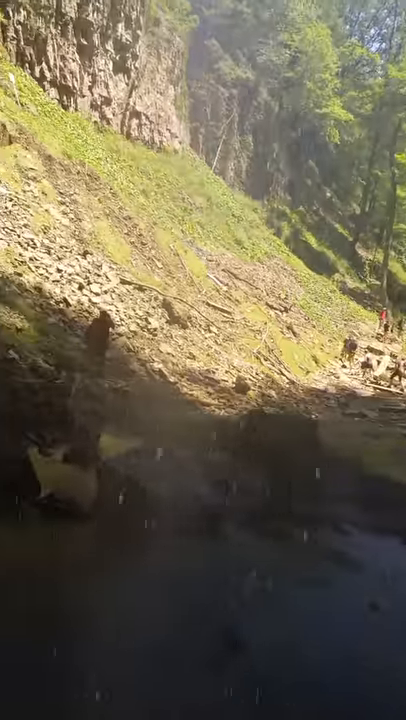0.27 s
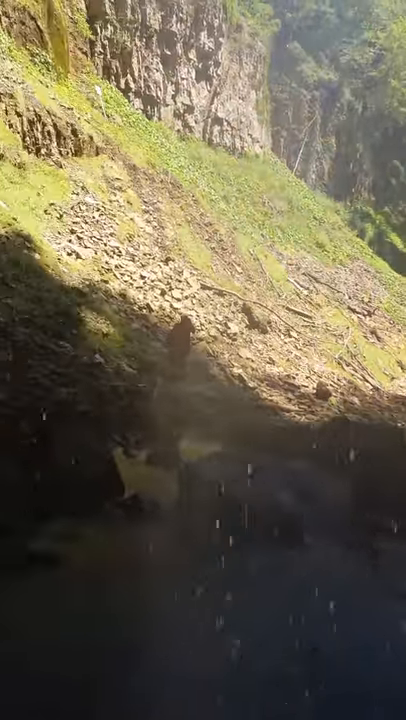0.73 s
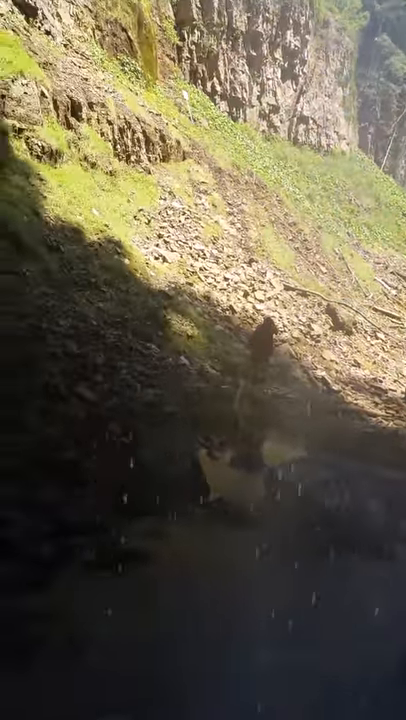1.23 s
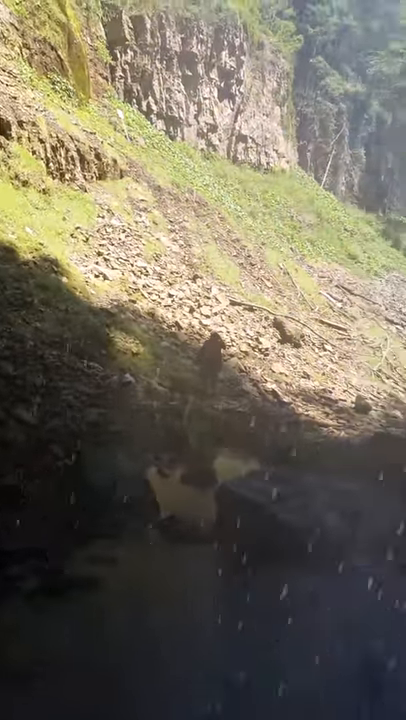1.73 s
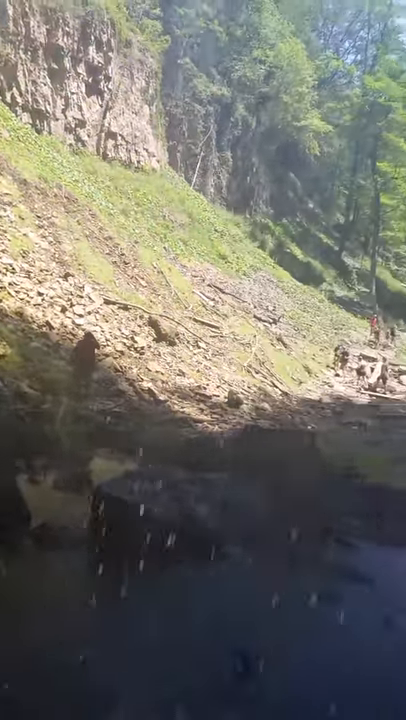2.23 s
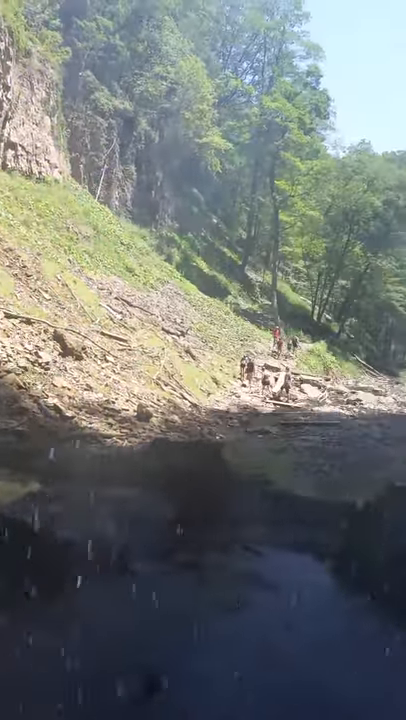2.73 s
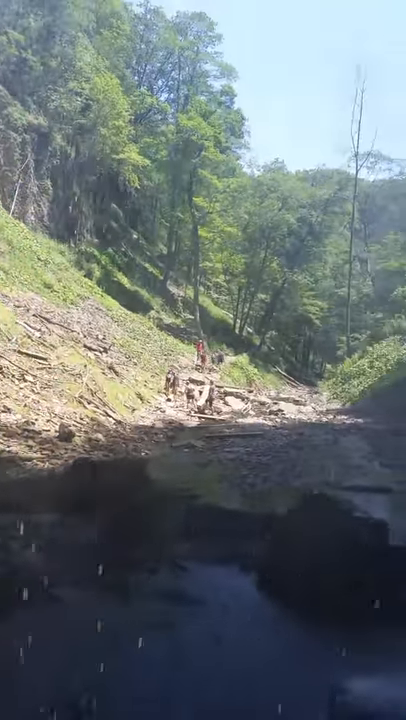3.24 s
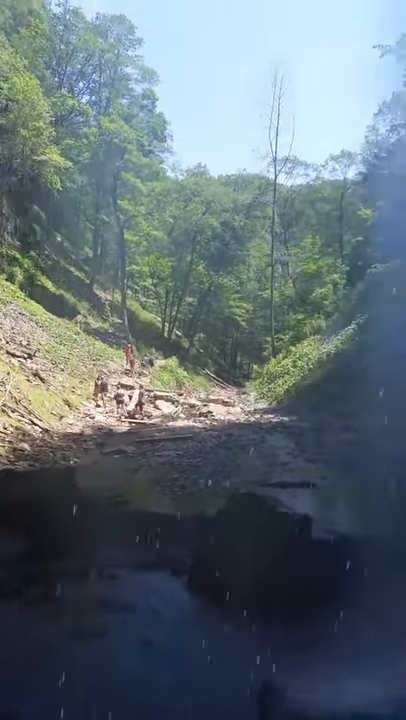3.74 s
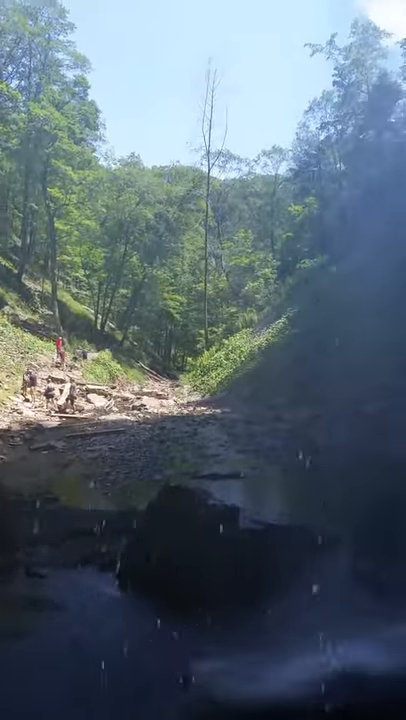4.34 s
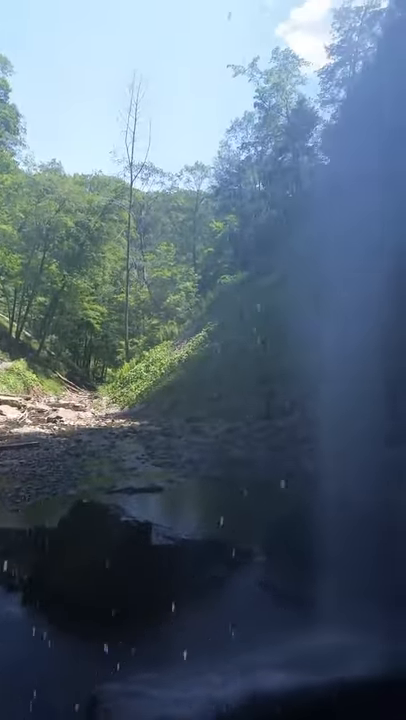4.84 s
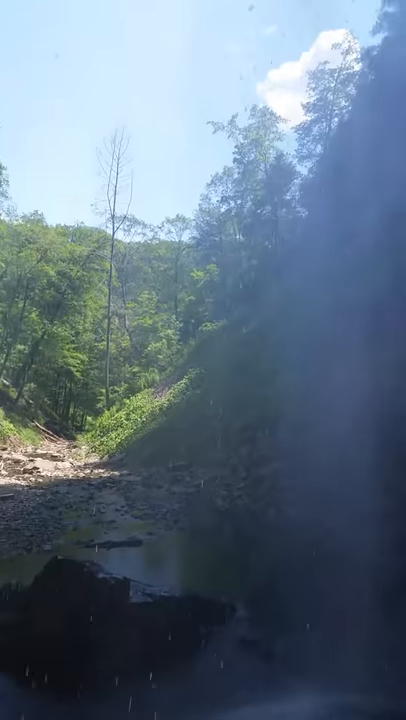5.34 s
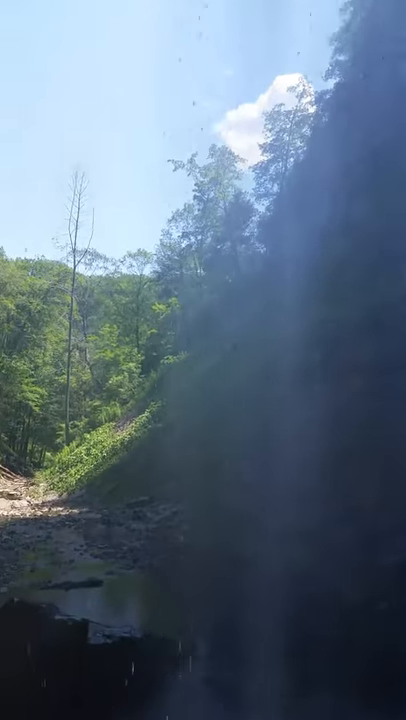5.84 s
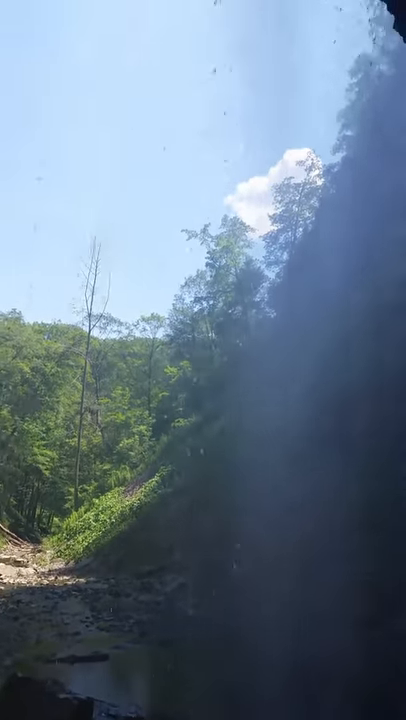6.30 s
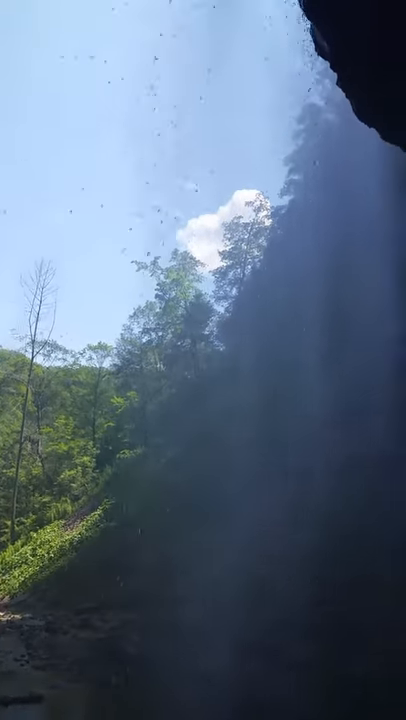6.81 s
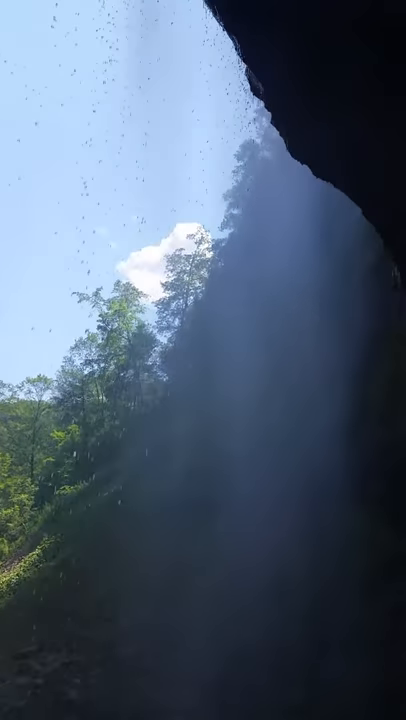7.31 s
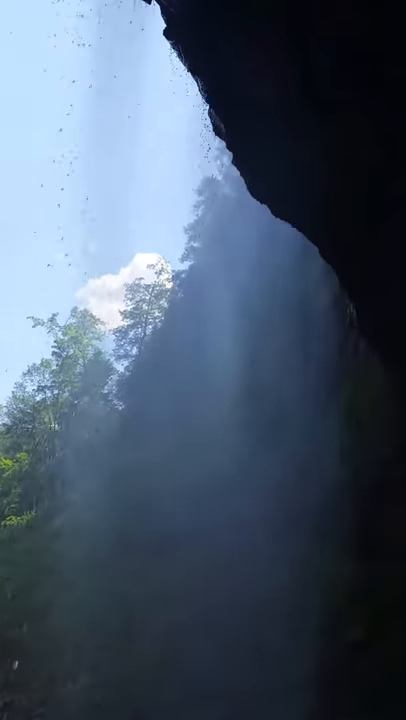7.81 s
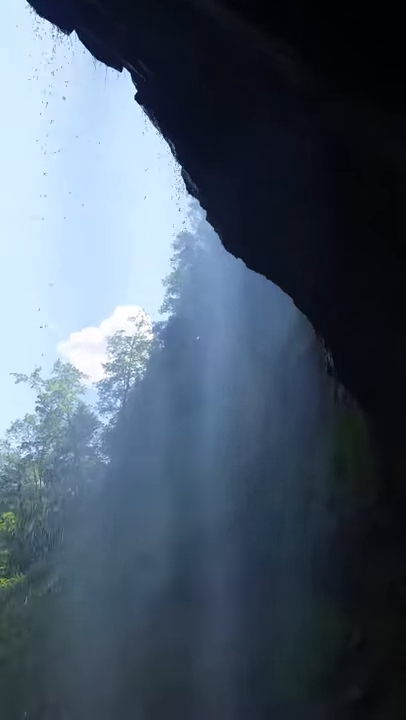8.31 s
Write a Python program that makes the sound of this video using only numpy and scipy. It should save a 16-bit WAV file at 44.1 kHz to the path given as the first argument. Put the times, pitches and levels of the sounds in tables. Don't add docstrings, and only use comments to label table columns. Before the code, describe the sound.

Close behind a tall waterfall, countless drops merge into a constant bright hiss, sharper on the right. Draught from the falling water buffets the handheld stereo microphone, far harder on the right: fluttering rumble, thumps and crackly snaps. Gusts cluster in the first second and return in bursts, with a calmer spell around five to six seconds. The hiss swells and changes colour towards the end.

```python
import sys
import numpy as np
from scipy import signal
from scipy.fft import rfft, irfft, next_fast_len
from scipy.io import wavfile
from scipy.ndimage import uniform_filter1d, map_coordinates

SR = 44100
rng = np.random.default_rng(int(sys.argv[2]) if len(sys.argv) > 2 else 0)


def transcribe(u):
    v = np.clip(np.atleast_2d(u).T, -1, 1)
    q = np.round(v * 32767).astype(np.int16)
    wavfile.write(sys.argv[1], SR, q)


def field_ratio(decibels):
    return 10 ** (np.asarray(decibels, dtype=float) / 20)


N = 377496
STEP = 8


def unit(x):
    return x / np.sqrt(np.mean(x ** 2, axis=-1, keepdims=True) + 1e-20)


def along(points, hz):
    point_hz, value = np.transpose(points)
    return np.interp(np.log(hz + 1), np.log(point_hz + 1), value)


def curves(rows, t):
    s, *columns = np.transpose(rows)
    return [np.interp(t, s, column) for column in columns]


def slow_s():
    return np.arange(0, N, STEP) / SR


def wobble(rate_hz):
    knots = np.clip(rng.standard_normal(N // 100), -1.7, 1.7)
    return map_coordinates(knots, [slow_s() * rate_hz])


def filtered(x, response):
    size = next_fast_len(x.shape[-1] + 8192)
    spectrum = rfft(x, size) * response(np.fft.rfftfreq(size, 1 / SR))
    return irfft(spectrum, size)[..., :x.shape[-1]]


# time in seconds, level in dB.
FALL = [(0, -25), (.5, -25.5), (.85, -25.5), (1.17, -22.5), (1.57, -24), (1.7, -25.5), (1.82, -24),
        (2.6, -23), (3.55, -23), (3.95, -21.5), (4.5, -22.5), (5.13, -25), (5.47, -23.5), (5.66, -27),
        (5.88, -23.5), (6.77, -21), (7.5, -20.5), (8.55, -23)]
# time in seconds, turn 0-1, tilt 0-1.
TURN = [
    (0, 0.34, 0.3),
    (.6, 0.2, 0),
    (1.8, 0.06, 0),
    (3, .5, 0.19),
    (4.2, 0.77, .1),
    (5.6, 1, 0.13),
    (7.8, 0.84, 0.42),
    (8.4, 0.71, 0.99),
    (8.55, 0.7, 0.93),
]
# frequency in Hz, level in dB per Hz.
WATER_LEFT = [(150, -21), (400, -18), (630, -15.5), (810, -16), (950, -15), (2110, -12), (3790, -14),
              (5820, -39), (7920, -11), (9530, -3.4), (10450, -0.5), (12190, -1), (15600, -10.5)]
WATER_RIGHT = [(150, -19), (600, -33), (790, -18), (1700, -11.5), (6150, -1), (6680, -1.5), (7870, -7),
               (8540, -4.5), (9790, 2.5), (10350, 1.5), (11860, -4.5), (13980, 1), (15600, -3)]
# frequency in Hz, shared part 0-1.
ALIKE = [(300, .4), (700, 0.27), (1200, 0.6), (1800, 0.45), (2500, 0.05), (4000, 0.03)]
SPRAY_HZ = 8200
SPLASH_TURN_DB, SPLASH_TILT_DB = 0.4, 4
LEFT_TURN_DB, LEFT_TILT_DB = 0.8, 3.5
RIGHT_DB, RIGHT_TURN_DB = 0.7, -3.5
LAG_S, LAG_TURN_S = 0.00021, 0.00008


def waterfall():
    noise = rng.standard_normal((2, N + 512))
    hz, t, (one, other) = signal.stft(noise, SR, nperseg=512)
    hz = hz[:, None]
    turn, tilt = curves(TURN, t)

    share = np.clip(along(ALIKE, hz), 0, 0.95)
    late = np.exp(-2j * np.pi * hz * (LAG_S + LAG_TURN_S * turn))
    left = share * late * one + np.sqrt(1 - share ** 2) * other
    ports = np.array([left, one])

    colour_db = np.array([along(WATER_LEFT, hz) - 4.5, along(WATER_RIGHT, hz)])
    patches = uniform_filter1d(rng.standard_normal(ports.shape), 14, 1)
    patches = uniform_filter1d(patches, 9, 2)
    patches_db = 0.39 * patches / patches.std()

    fine = 1 / (1 + (SPRAY_HZ / (hz + 1)) ** 16)
    splash_db = SPLASH_TURN_DB * turn + SPLASH_TILT_DB * tilt
    spray_left_db = LEFT_TURN_DB * turn + LEFT_TILT_DB * tilt
    spray_right_db = RIGHT_DB + RIGHT_TURN_DB * turn
    left_db = (1 - fine) * splash_db + fine * spray_left_db
    right_db = fine * (hz / 12000) ** 2 * spray_right_db
    turn_db = np.array([left_db, right_db])

    hiss = signal.istft(ports * field_ratio(colour_db + turn_db + patches_db), nperseg=512)[1]
    sheets_db = np.repeat(0.56 * wobble(34), STEP)[:N]
    flow_db = curves(FALL, np.arange(N) / SR)[0] + 10.5
    return field_ratio(flow_db + ducking() + sheets_db) * hiss[:, :N]


# time in seconds, depth in dB.
CATCHES = [(.235, 3), (.36, 1), (.5, 2), (.695, 3), (.82, 0.5), (1.215, 1.5), (2.26, 2.5), (2.861, 0.5),
           (2.985, 1), (4.015, 4.5), (4.26, 1.5), (4.61, 4), (4.7, 1.5), (4.734, 2), (4.865, 2.5),
           (4.944, 4.5), (5.769, 1), (6.41, 1), (7.55, 2.5), (7.619, 2.5), (7.975, 2.5), (8.17, 1.5),
           (8.241, 4.5), (8.265, 4), (8.31, 1), (8.35, 2), (8.521, 3), (8.555, 4)]
GRAB_S, RELEASE_S = 0.026, 0.036
DUCK_FROM_DB, DUCK_SLOPE, RECOVER_S = -22.5, 0.22, 0.081


def ducking():
    keep = np.exp(-STEP / SR / RECOVER_S)
    large_db = air()[0]
    heard = signal.lfilter([1 - keep], [1, -keep], field_ratio(large_db - DUCK_FROM_DB) ** 2)
    sag_db = 10 * DUCK_SLOPE * np.log10(1 + heard)

    s, depth_db = np.transpose(CATCHES)
    since_s = slow_s() - s[:, None]
    grab = np.clip(since_s / GRAB_S + 1, 0, 1)
    release = np.exp(-np.maximum(since_s, 0) / RELEASE_S)
    caught_db = depth_db @ (grab * release)
    return np.repeat(-sag_db - caught_db, STEP)[:N]


RISE_S, DIE_S = 0.012, 0.018


def gusts(start_s, length_s, db):
    since_s = slow_s() - start_s[:, None]
    rise = np.clip(since_s / RISE_S + 1, 0, 1)
    die = np.exp(-np.maximum(since_s - length_s[:, None], 0) / DIE_S)
    return field_ratio(db) ** 2 @ (rise * die) ** 2


# time in seconds, level in dB.
BREEZE = [(0, -27), (1.3, -24.5), (1.45, -33), (2, -27), (3.15, -26), (3.3, -32), (3.6, -27), (3.95, -24),
          (4.45, -29), (4.58, -25), (5.1, -28), (5.6, -30), (6.2, -29), (6.6, -26), (7.02, -22),
          (7.15, -28), (8.05, -32), (8.55, -33.5)]
# start in seconds, length in seconds, strength in dB, sharpness in dB.
GUSTS = [(.215, 0.054, -19, 5), (0.344, 0.076, -18, 5), (0.435, .24, -21, 4), (.7, .22, -19, 3),
         (0.922, 0.21, -18, 3), (1.203, 0.02489, -18, 3), (2.028, 0.028, -19, -5), (2.096, 0.097, -22, 5),
         (2.192, 0.075, -17, 1), (2.336, 0.36, -24, -2), (2.66, .3, -21, 3), (2.98, 0.066, -19, 1),
         (3.319, 0.24, -22, -1), (4.011, 0.052, -22, 3), (4.058, 0.18, -23, 0), (4.259, .17, -23, 5),
         (4.594, 0.059, -18, 0), (4.692, 0.061, -15, 4), (4.763, 0.12, -20, 2), (4.939, 0.049, -19.5, 2.5),
         (6.308, 0.1044, -21, -3), (6.408, 0.136, -20, -3), (6.642, 0.12, -20, 1), (6.875, 0.0547, -16, 0),
         (7.182, 0.36, -20, -1), (7.541, 0.14, -16, -6), (7.701, .27, -21, 1), (8.112, 0.15, -15, -8),
         (8.241, .19, -18, -2.5), (8.49, 0.081, -19, -1.5)]
WAKE_S, WAKE_SHARP_DB, WAKE_KEENER = 0.00998, 6, 0.403
AIR_REF_DB = -22
# level in dB at AIR_REF_DB, dB per dB of air, dB per dB of sharpness, floor in dB
LARGE_LAW = (-22, 1, 0, -120)
SMALL_LAW = (-31.5, 1.35, 1.21, -120)
FINE_LAW = (-44, 1.7, 1.6, -50.5)


def air():
    wakes = [(s, WAKE_S, wake_db, WAKE_SHARP_DB + WAKE_KEENER * sharp_db)
             for s, _, sharp_db, wake_db in BURSTS]
    s, length_s, db, sharp_db = np.transpose(list(GUSTS) + wakes)
    calm_db = curves(BREEZE, slow_s())[0]
    levels = []
    for base_db, grows, bite, floor_db in (LARGE_LAW, SMALL_LAW, FINE_LAW):
        gust_power = gusts(s, length_s, base_db + grows * (db - AIR_REF_DB) + bite * sharp_db)
        calm_power = field_ratio(base_db + grows * (calm_db - AIR_REF_DB)) ** 2
        levels.append(10 * np.log10(gust_power + calm_power + field_ratio(floor_db) ** 2))
    return levels


def eddies(spectrum, octaves, lumpy_db):
    speed = 2 ** np.clip(octaves, -2, 2)
    noise = rng.standard_normal(3 * N // 8)
    field = filtered(noise, lambda hz: field_ratio(along(spectrum, hz / STEP)))
    return unit(map_coordinates(field, [np.cumsum(speed)]) * field_ratio(lumpy_db))


# start in seconds, length in seconds, strength in dB.
LEE = [(0.02, .14, -39), (.29, 0.079, -32), (.49, .2, -31), (0.895, 0.11, -28), (1.035, 0.042, -21),
       (1.097, .15, -34.5), (1.47, 0.16, -39), (2.118, .05, -28), (2.198, 0.18, -40), (2.421, 0.053, -33),
       (2.551, 0.26, -38), (3.482, .11, -33), (3.67, 0.082, -39.5), (4.072, 0.32, -37), (4.449, 0.038, -33),
       (4.724, 0.18, -31.5), (5.024, 0.073, -38), (5.155, .05, -40.5), (5.98, .13, -40.5),
       (6.238, .12, -36.5), (6.656, 0.37, -31), (7.326, 0.14, -29), (7.58, 0.085, -33),
       (7.772, 0.11, -35.5), (8.129, .12, -32), (8.3, 0.24, -41.5)]
# frequency in Hz, level in dB per Hz.
LARGE = [(15, -17), (40, -4.5), (90, 0.7), (150, -2.5), (230, -12.5), (330, -22.5), (500, -59)]
SMALL = [(80, -35), (200, 1.5), (320, -1.5), (480, -7.5), (700, -18.5), (1000, -37.5)]
LEE_CALM_DB = -46


def draught():
    large_db, small_db, fine_db = air()
    gust, flick = wobble(42), wobble(120)
    fitful = np.clip(-large_db / 24, 0.5, 1.6) * gust
    swing = eddies(LARGE, 0.28 * gust + 0.015 * (large_db + 22), 3.2 * fitful)
    rattle_octaves = 0.02 * (fine_db + 48) - 0.1 + 0.15 * gust + 0.22 * flick
    rattle = eddies(SMALL, rattle_octaves, 2.1 * fitful + 1.9 * flick)
    crackle = eddies(SMALL, 1.15 + 0.1 * gust + 0.3 * flick, 0.4 * gust + 5 * flick)
    crackle_db = fine_db - 0.4 + np.minimum(fine_db + 53.5, 0)
    right = field_ratio(large_db) * swing + field_ratio(small_db - 2) * rattle + field_ratio(crackle_db) * crackle

    lee_db = 10 * np.log10(gusts(*np.transpose(LEE)) + field_ratio(LEE_CALM_DB) ** 2)
    calm = wobble(26)
    lee_octaves = 0.22 * calm + 0.015 * (lee_db + 40) - 0.2
    left = field_ratio(lee_db + 1.8) * eddies(LARGE, lee_octaves, 2 * calm)
    return signal.resample_poly([left, right], STEP, 1, axis=1)[:, :N]


def cycle(hz, t):
    return np.sin(2 * np.pi * hz * t) * np.exp(-(hz * t / 0.71 - 0.8) ** 2)


# time in seconds, strength in dB, sharpness in dB, wake in dB.
BURSTS = [(0.231, -11.5, 2.5, -22), (.338, -13.5, -0.5, -23), (.365, -18.5, 12, -20),
          (0.48, -11, -2.5, -23), (.524, -15, 4, -25), (0.692, -9.5, 6.5, -30), (.717, -15, -8, -28),
          (0.795, -11.5, -2, -25.5), (.835, -9.5, -0.5, -26), (.928, -13.5, 6, -22), (1.015, -14.5, 4, -21),
          (1.085, -17, -1, -27), (1.108, -10, 0, -28.5), (2.216, -14, 7, -23), (2.258, -7.5, -1, -29.5),
          (2.585, -12.5, 2, -25), (2.721, -13, -5, -23), (2.981, -9.5, -1, -31), (4.01, -12.5, 0.5, -24),
          (4.049, -15, 2.5, -26), (4.603, -13, -1, -25.5), (4.701, -19, 8.5, -21),
          (4.739, -20, -0.5, -19.5), (4.856, -8.5, 0, -31.5), (4.935, -6.5, 0.5, -28),
          (6.407, -10.5, -3, -24.5), (7.968, -9.5, -0.5, -33.5), (8.237, -9, -3, -26.5),
          (8.286, -12, 1, -25.5), (8.311, -12.5, 7, -20.5)]
# time in seconds, strength in dB.
FLUTTERS = [(0.399, -23), (.446, -25), (.655, -22), (0.957, -16), (1.471, -24.5), (1.6, -25), (2.103, -23),
            (2.14, -18.5), (2.367, -19), (2.663, -21.5), (2.758, -13.5), (3.417, -19), (3.515, -22),
            (3.748, -22), (4.12, -22.5), (4.258, -18), (4.303, -17.5), (4.34, -17.5), (4.395, -21),
            (4.796, -12.5), (5.906, -25.5), (6.028, -18), (6.725, -18), (7.183, -13.5), (7.308, -23.5),
            (7.342, -15), (7.49, -27), (7.725, -14.5), (7.9, -21), (8.341, -23)]
# time in seconds, strength in dB.
THUMPS = [(.105, -20.5), (0.221, -16.5), (1.207, -16), (1.72, -31), (1.791, -25.5), (2.175, -23),
          (2.859, -11.5), (3.455, -22), (3.945, -21), (4.61, -9), (4.886, -16), (5.05, -17), (5.36, -23),
          (5.449, -19.5), (5.71, -22), (5.77, -19.5), (6.252, -19), (6.336, -17), (6.657, -18.5),
          (6.878, -14.5), (6.896, -11), (7.225, -18.5), (7.544, -16.5), (7.565, -14.5), (7.809, -24),
          (8.162, -18), (8.262, -12), (8.376, -17), (8.549, -22.5)]
# flap dB, front dB, swing dB
BURST, FLUTTER, THUMP = (0, -19.5, -7), (0, -19, -3), (-4, -27, 0)


def puffs():
    rows = [(s, *(db + np.array(BURST) + [0, sharp_db, 0])) for s, db, sharp_db, _ in BURSTS]
    rows += [(s, *(db + np.array(FLUTTER))) for s, db in FLUTTERS]
    rows += [(s, *(db + np.array(THUMP))) for s, db in THUMPS]
    chance = rng.standard_normal((len(rows), 4))
    right = np.zeros(N + SR)
    t = np.arange(SR // 25) / SR
    for (s, flap_db, front_db, swing_db), (sign, steep, high, low) in zip(rows, chance):
        u = (t - 0.0015) / (0.00026 * 2 ** (0.37 * steep))
        front_db = front_db + 21.5 + min(front_db + 28, 0)
        front = field_ratio(front_db) * u * np.exp(-u * u / 2)
        flap = field_ratio(flap_db + 3) * cycle(380 * 2 ** (0.21 * high), t)
        swing = field_ratio(swing_db + 6.5) * cycle(130 * 2 ** (0.41 * low), t)
        right[round(s * SR):][:len(t)] += np.sign(sign) * (front + flap - swing)
    return np.array([np.zeros(N), right[:N]])


def scene():
    return waterfall() + draught() + puffs()


def roll_off(x):
    return signal.sosfilt(signal.butter(12, 15735, fs=SR, output="sos"), x)


def record(dry):
    rounded = dry / (1 + np.abs(dry / 0.95) ** 6) ** (1 / 6)
    mix = filtered(rounded, lambda hz: hz < 15735)
    return roll_off(mix)


dry = scene()
out = record(dry)
transcribe(out)
```